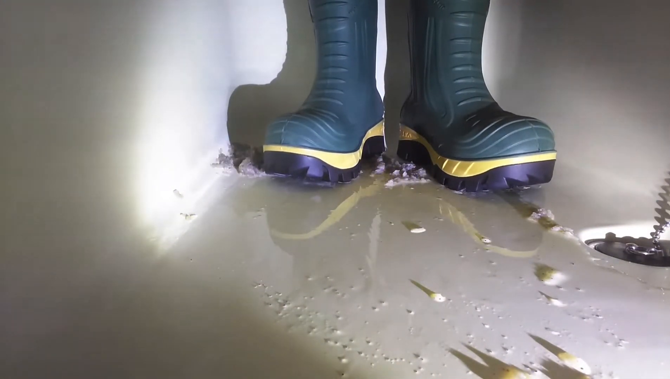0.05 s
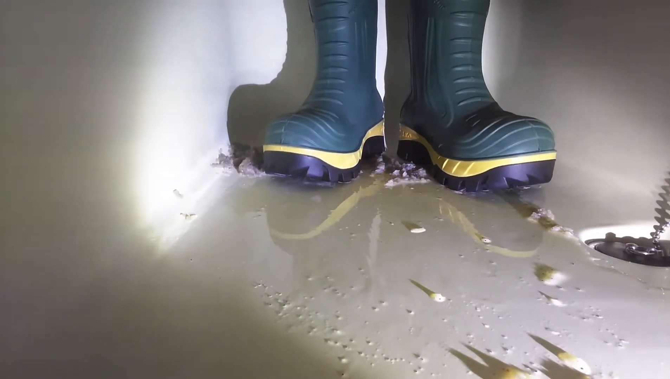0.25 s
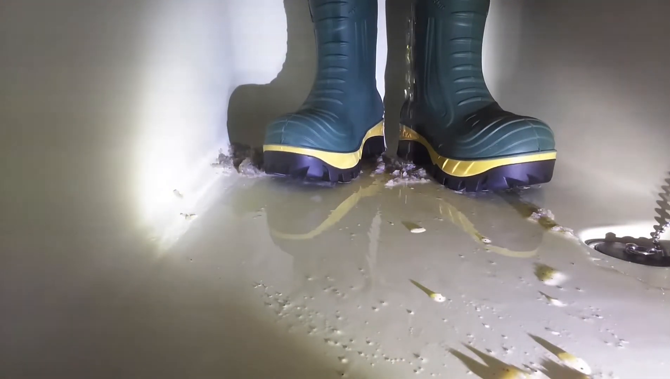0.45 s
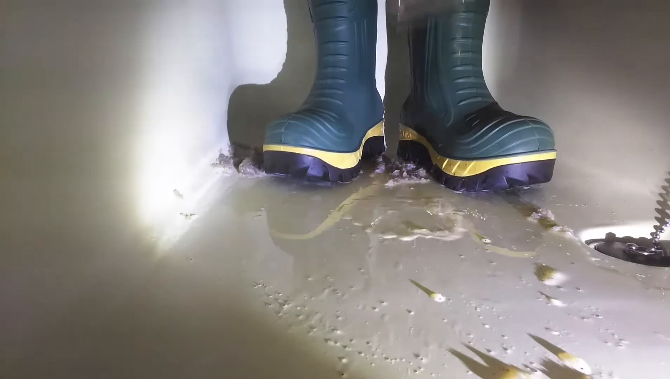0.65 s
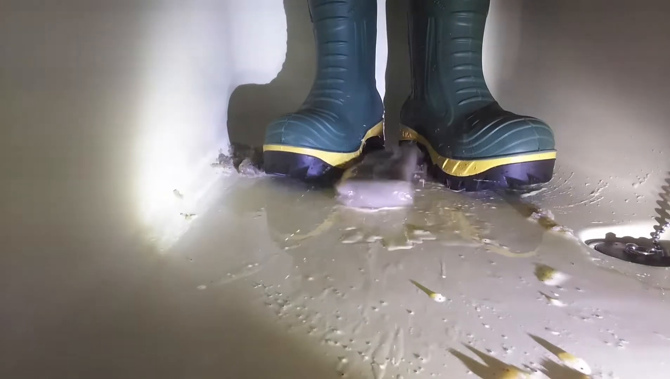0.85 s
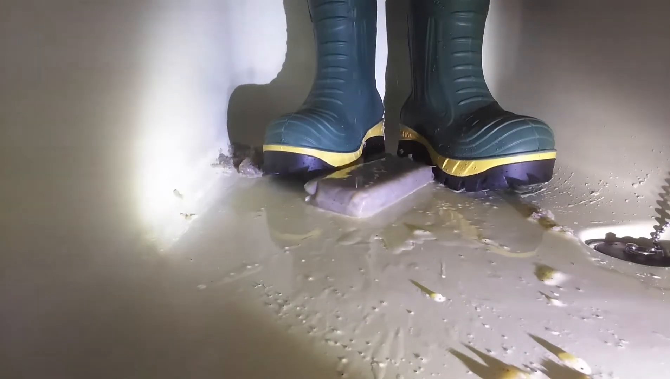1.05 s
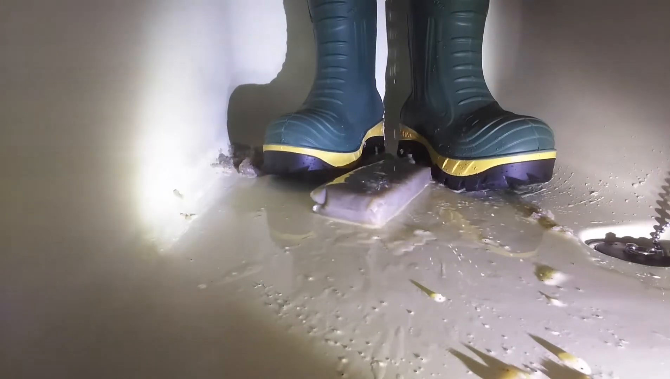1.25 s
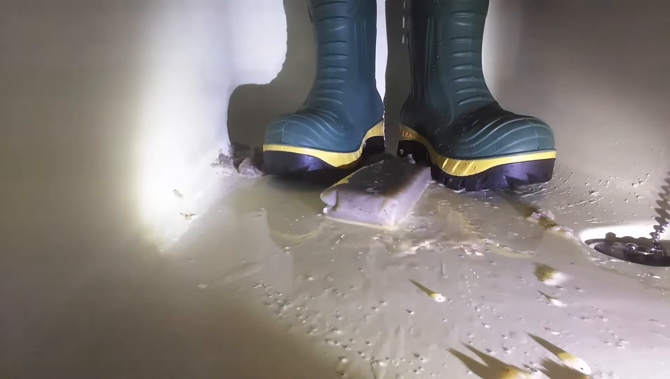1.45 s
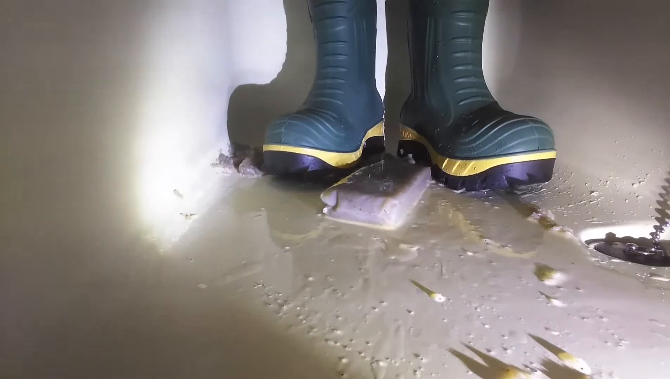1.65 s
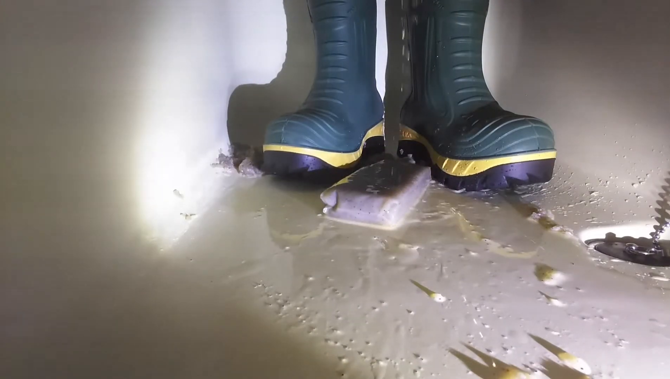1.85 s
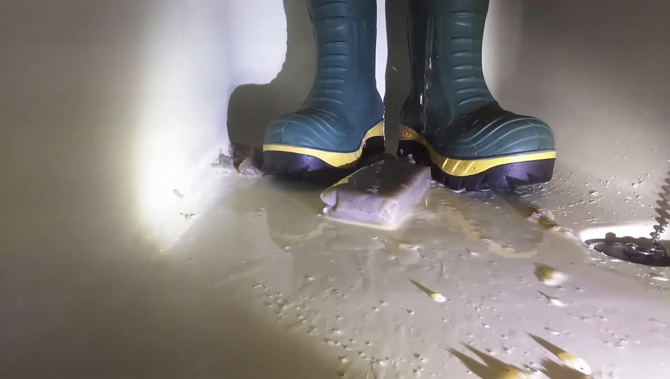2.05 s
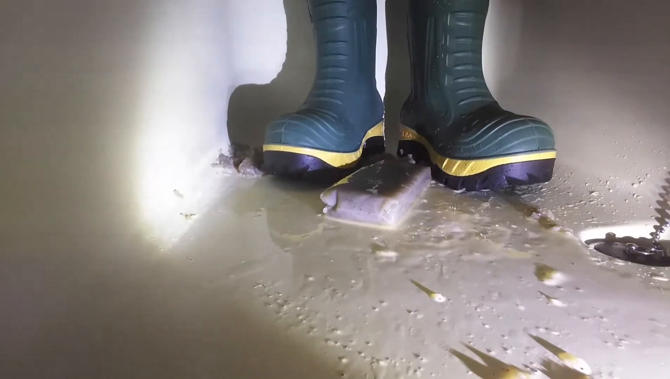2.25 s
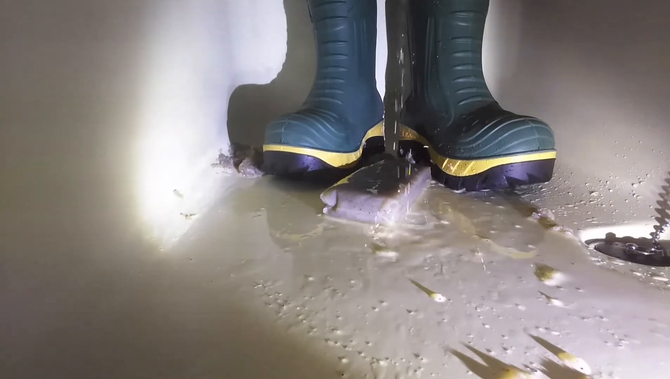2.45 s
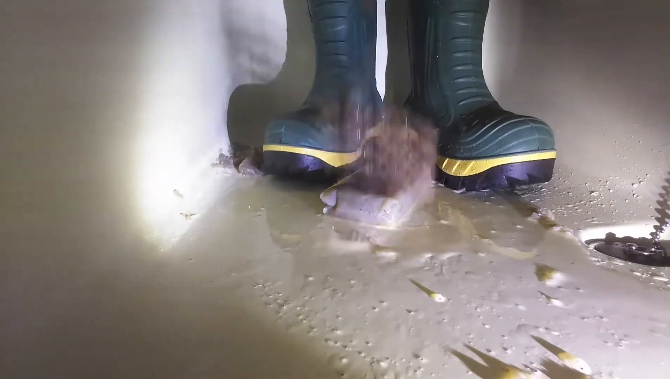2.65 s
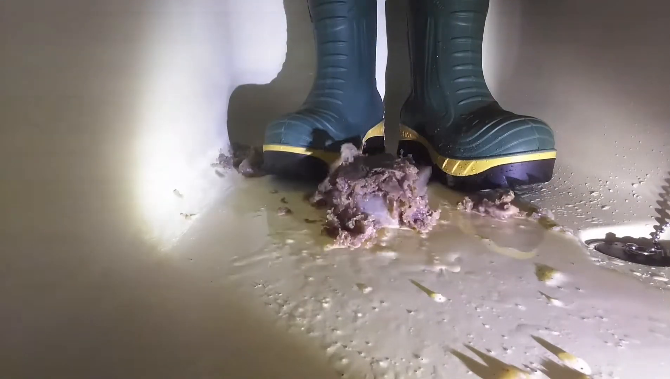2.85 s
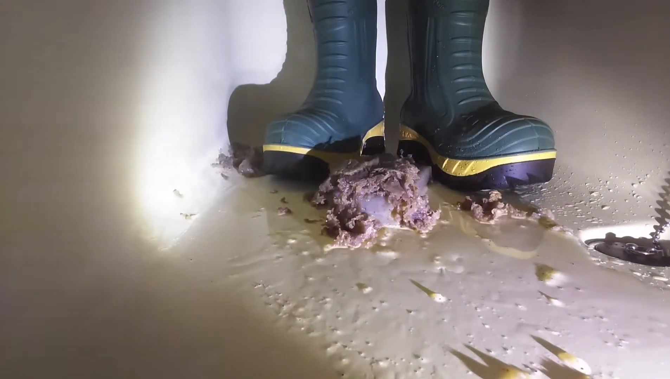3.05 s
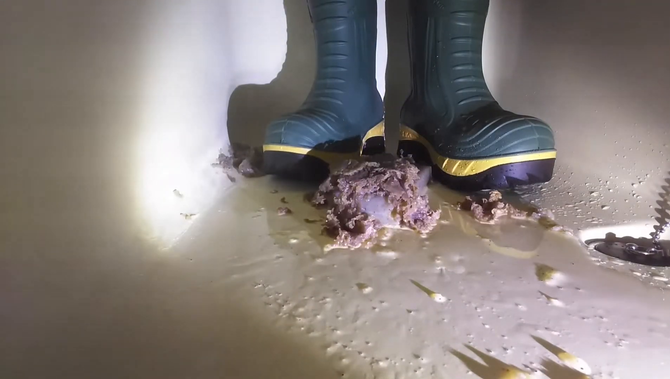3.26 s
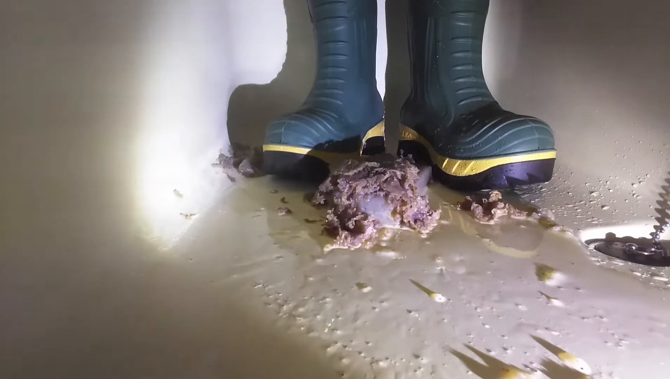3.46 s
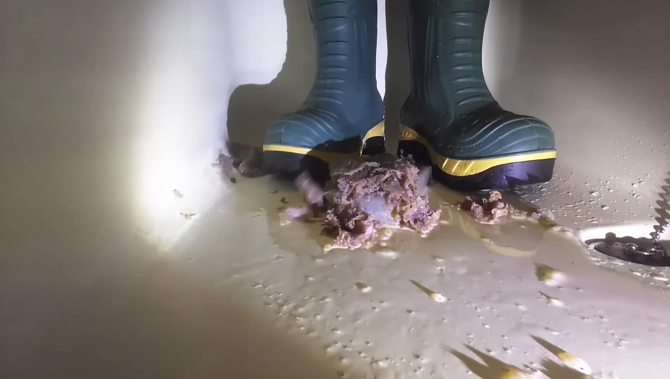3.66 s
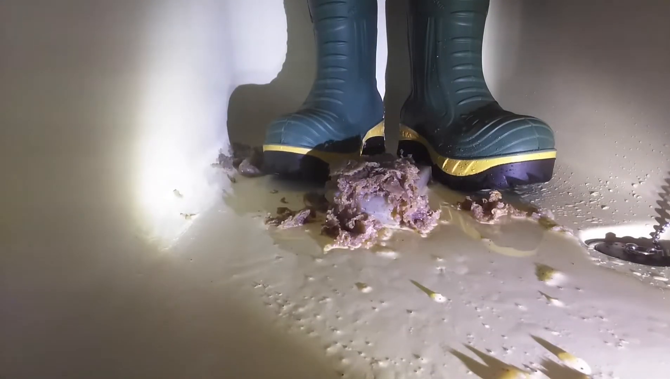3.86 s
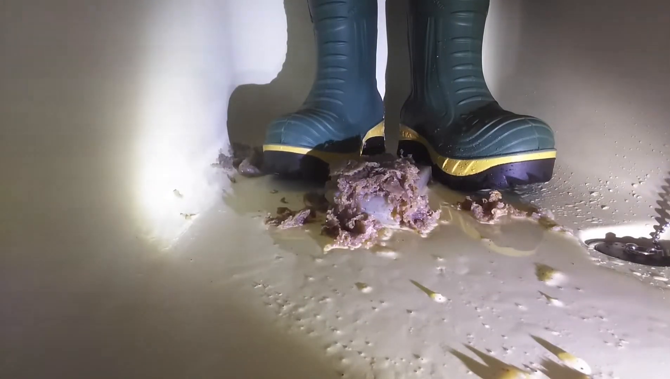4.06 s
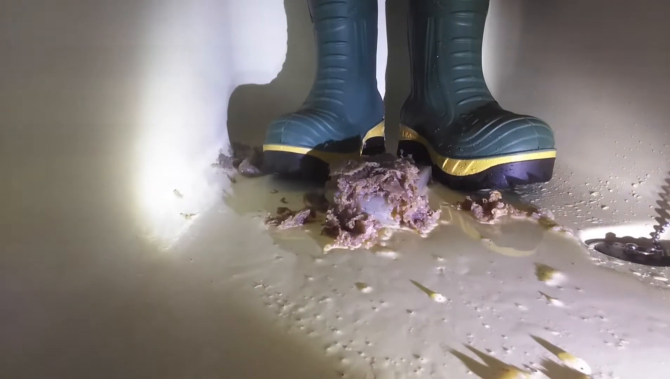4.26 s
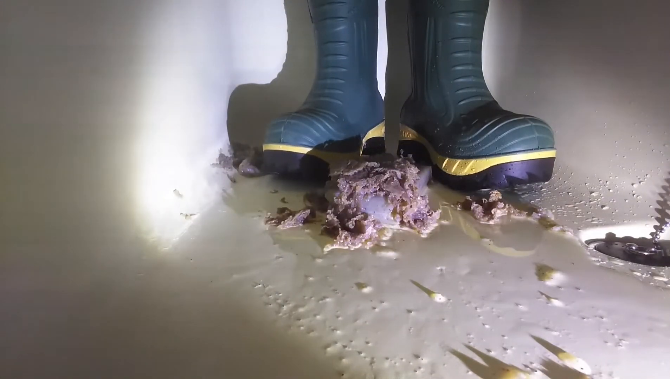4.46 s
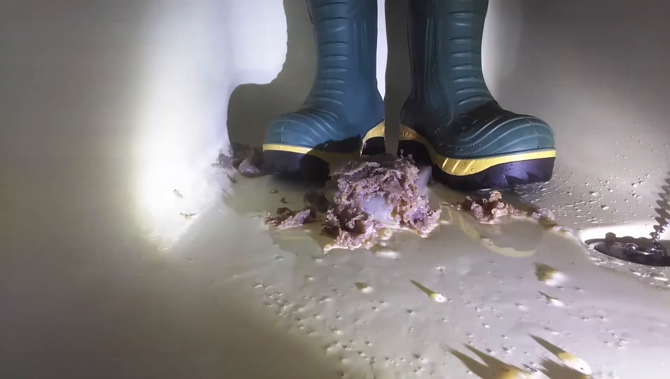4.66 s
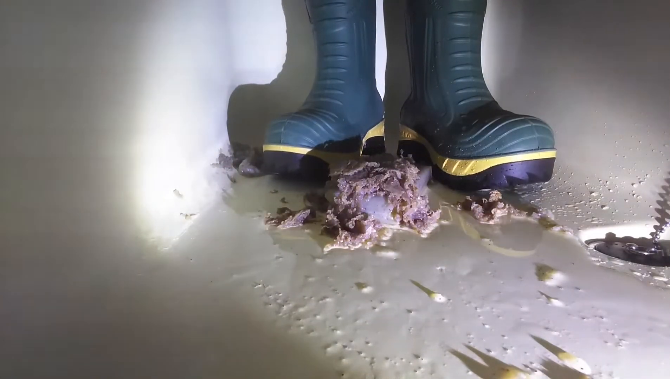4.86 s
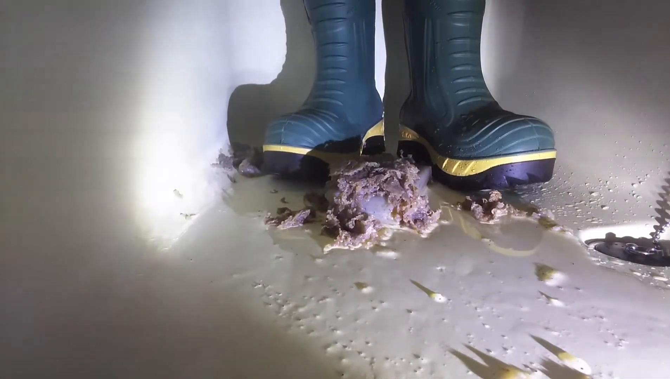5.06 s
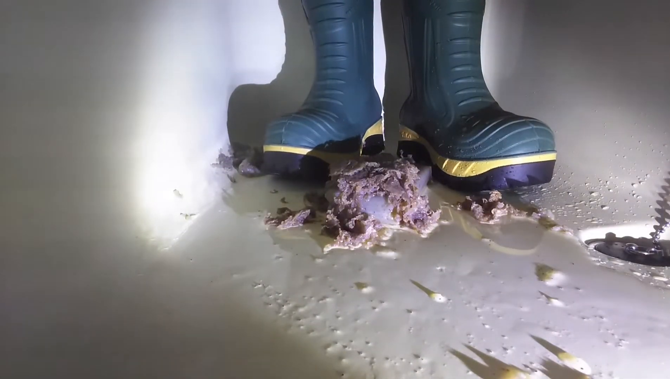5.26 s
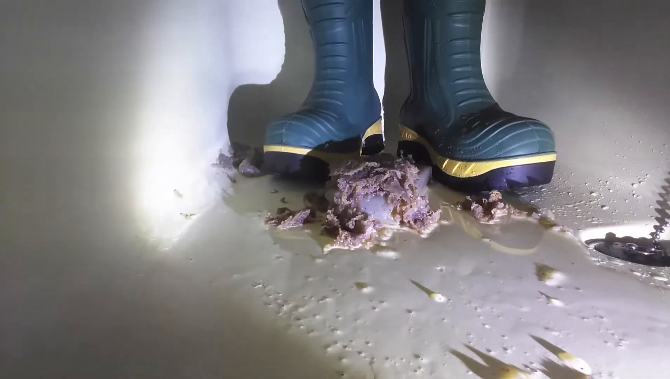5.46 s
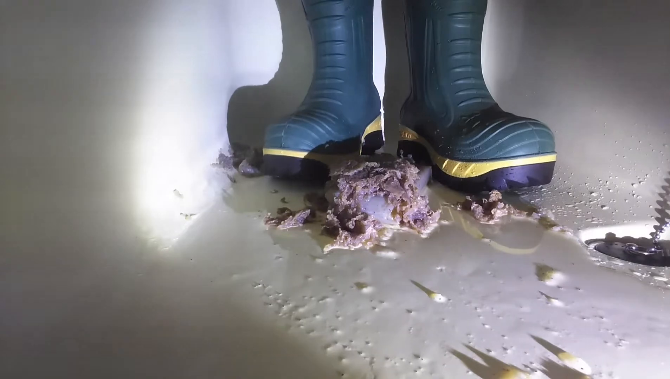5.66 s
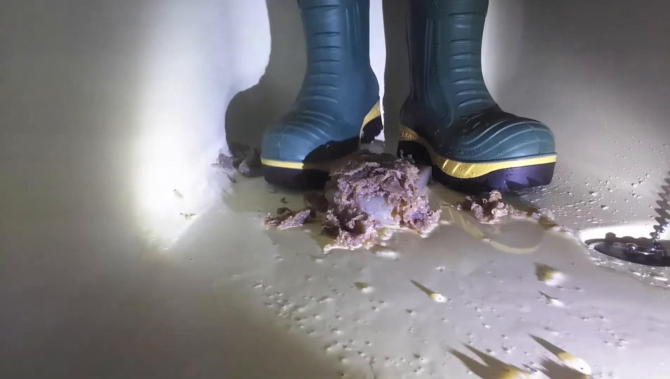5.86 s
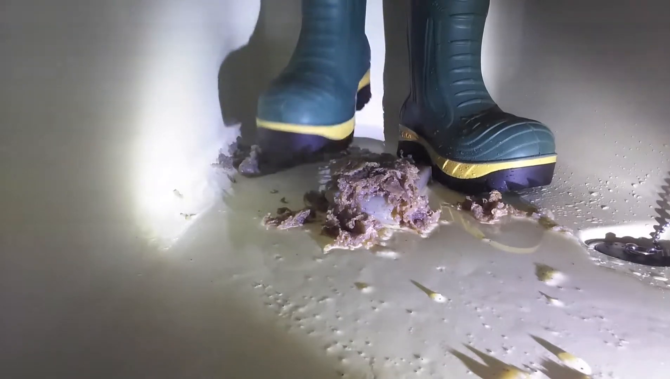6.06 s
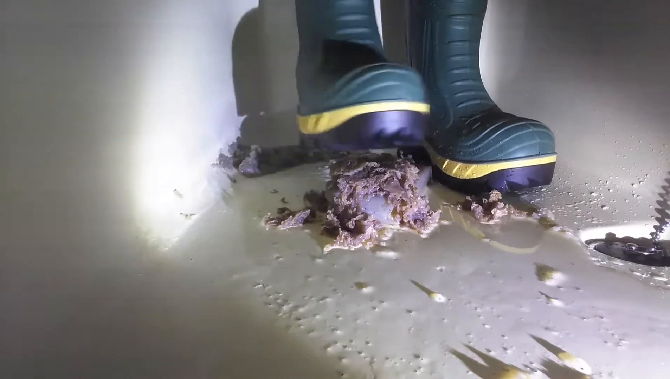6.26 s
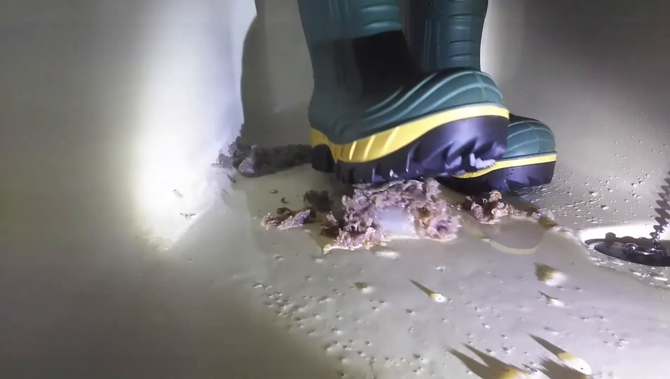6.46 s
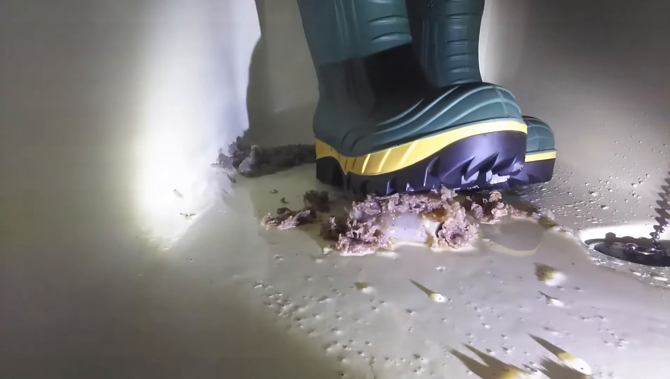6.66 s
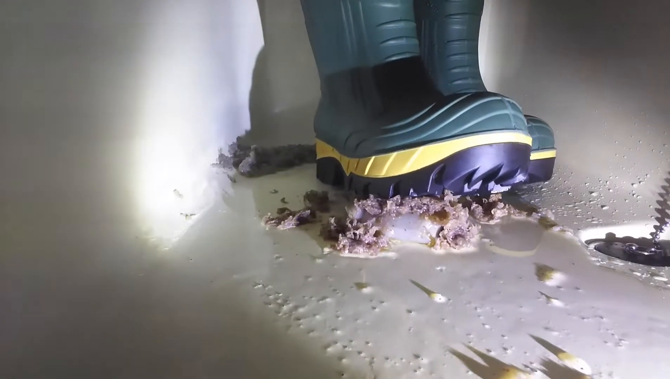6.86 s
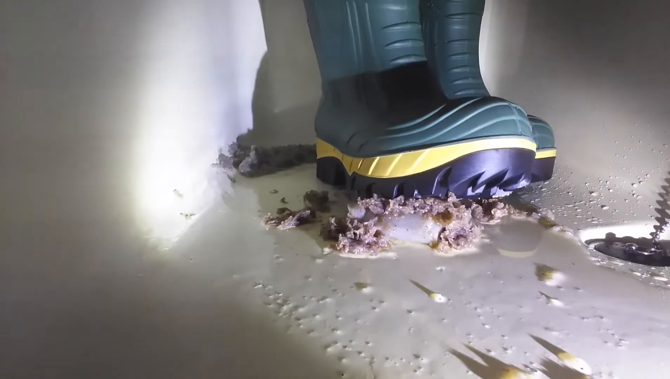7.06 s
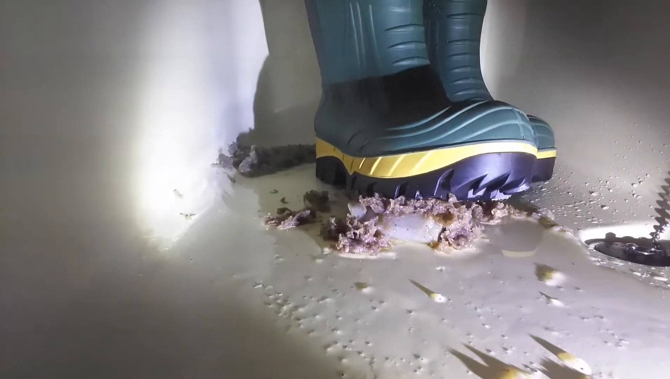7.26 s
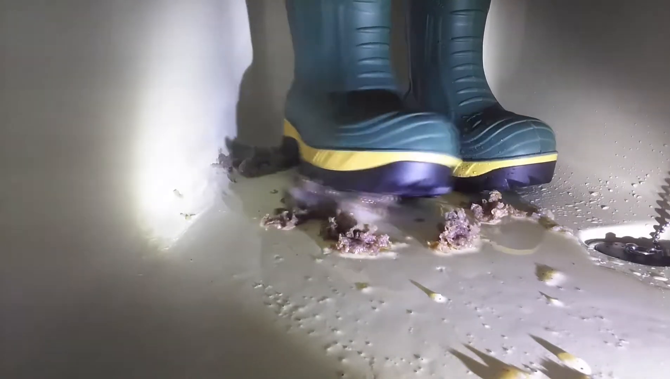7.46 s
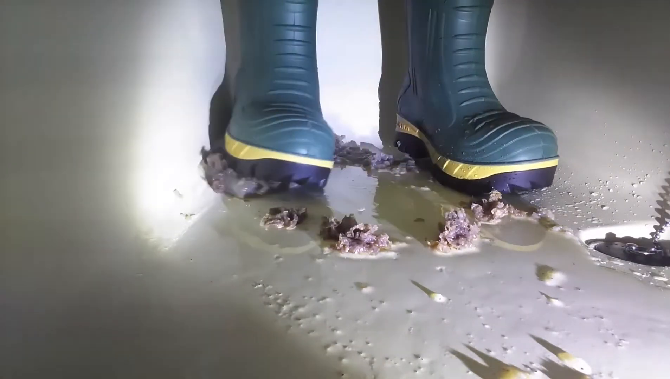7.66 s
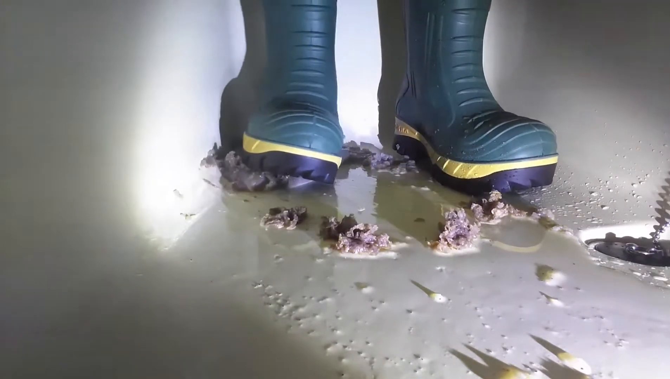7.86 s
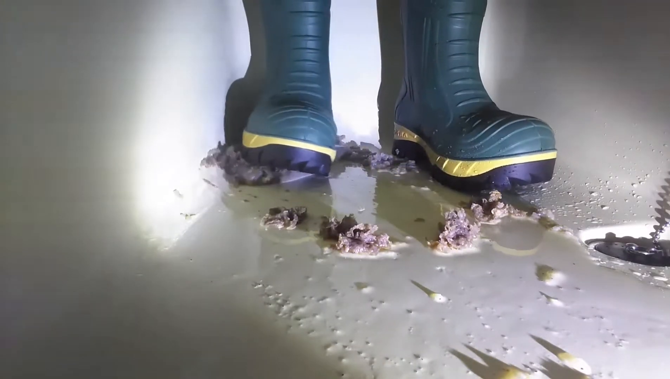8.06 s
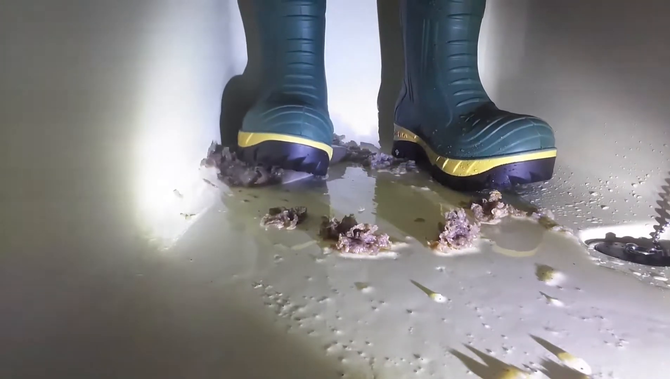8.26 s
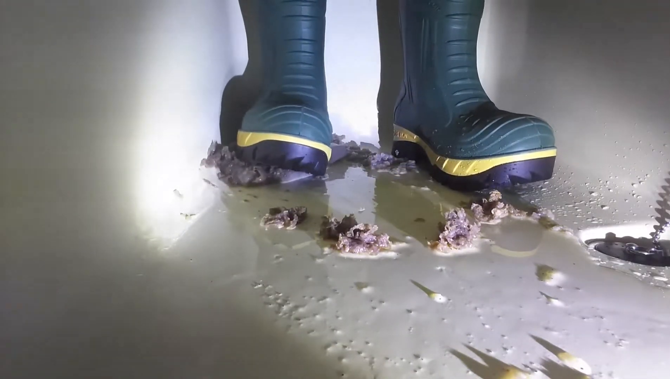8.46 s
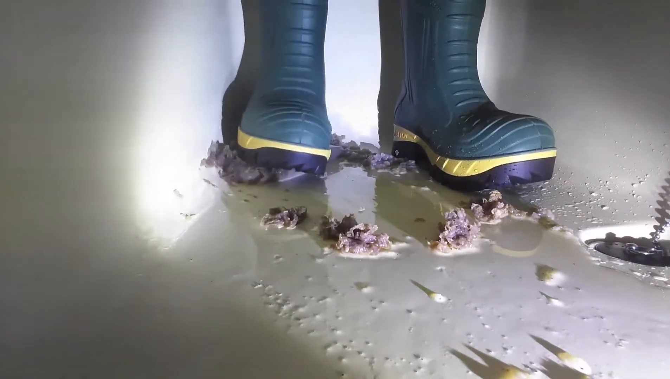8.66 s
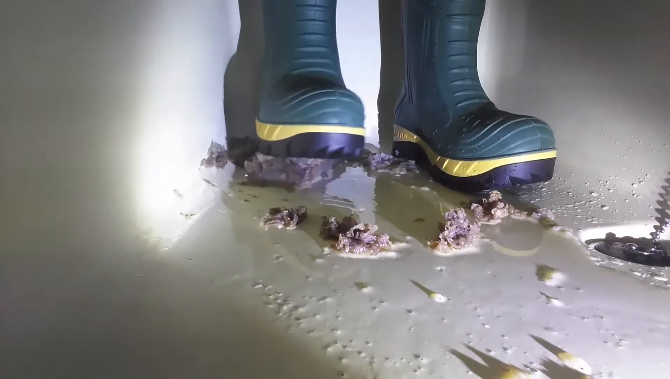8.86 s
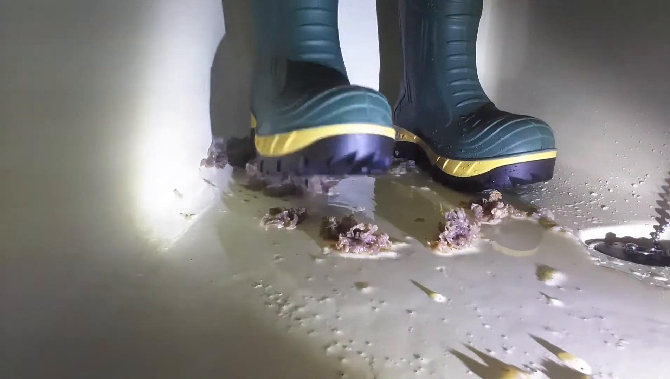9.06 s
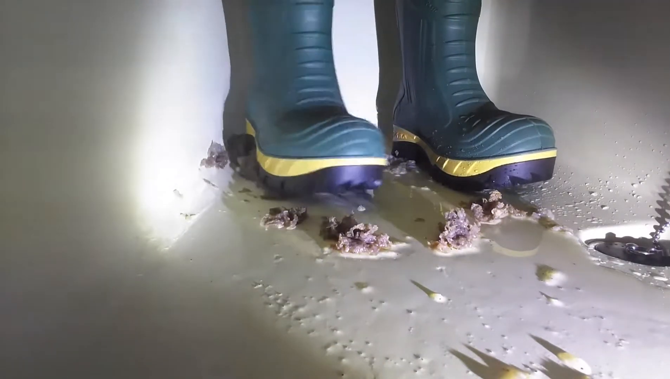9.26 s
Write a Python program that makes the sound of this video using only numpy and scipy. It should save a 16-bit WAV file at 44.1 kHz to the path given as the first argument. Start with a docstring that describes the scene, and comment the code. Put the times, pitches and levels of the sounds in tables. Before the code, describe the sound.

Soft food plops and splatters between boots in a tiled bathroom, a tin clatters faintly, then slow juicy squashing and sticky steps follow.

```python
"""A tiled bathroom, a pair of microphone ports close to the bathtub: soft food and its juice drop in
between two rubber boots as popping, smacking, spraying drops; a tin is knocked nearby as ringing noise.
A boot then peels free in coloured jerks, presses the heap, drags it back and shifts its weight: bubbles
and hiss squelch, the tub booms in its modes, the tiles answer in fading noise. A quiet house lies beneath."""
import sys
import numpy as np
from scipy import signal
from scipy.fft import rfft, irfft, next_fast_len
from scipy.io import wavfile
from scipy.ndimage import map_coordinates

SR = 44100
rng = np.random.default_rng(int(sys.argv[2]) if len(sys.argv) > 2 else 0)


def persist_wave(psi):
    """Save psi, clipped to +-1, as 16-bit WAV."""
    counts = np.round(np.clip(psi, -1, 1) * 32767).astype(np.int16)
    wavfile.write(sys.argv[1], SR, np.atleast_2d(counts).T)


N = 410571  # length in samples

# All levels of the sources in the tables are before the balance set in scene().
# The quiet house. Each row: frequency in Hz, level in dB per Hz (relative).
HOUSE_SPECTRUM = [(21, -44.5), (36, -7.5), (62, -1.5), (151, -13.5), (211, -8.5), (633, -19.5),
                  (757, -18.5), (1030, -20), (3340, -26.5), (5040, -32), (7390, -32), (9070, -34.5),
                  (12000, -37.5), (14800, -41), (16400, -63.5)]
# How the house swells and sinks. Each row: time in seconds, rumble in dB, hiss in dB.
HOUSE_LEVELS = [(0, -60, -66), (1, -54.5, -59.5), (3.2, -64, -62.5), (3.9, -62, -65.5), (4.3, -54, -65.5),
                (4.8, -58.5, -64), (5.5, -64, -60), (8, -58, -59.5), (9.31, -64, -61)]
# How alike the house reaches both ports. Each row: frequency in Hz, left-right likeness (1 is mono).
HOUSE_LIKENESS = [(60, 0.81), (180, 0.91), (550, 0), (1650, 0), (4970, 0), (15000, 0)]
# Two bands where the house hiss is stronger. Each row: centre in Hz, width in Hz, strength in dB.
HISS_BANDS = [(5090, 350, 9.5), (9300, 590, -5.5)]
HUM_HZ, HUM_DB = 40.9, -55.5  # a low steady hum

# Modes of the tub. Each row: frequency in Hz, level in dB, 60 dB decay in seconds when free to ring.
TUB_MODES = [(50, -22.5, 0.96), (99.9, -1, 0.31), (182, 2.5, 0.3), (216, -7.5, 0.64), (271.7, -10.5, 0.89),
             (332, -12.5, 0.29), (386, -11, 0.29), (475, -16, 0.62), (567, -20, 0.42)]
# The second tub mode, stirred by shifting weight. Each row: time in seconds, level in dB.
SWAY_LEVELS = [(0.5, -69), (0.79, -39.5), (0.97, -28.5), (1.26, -58.5), (1.9, -48.5), (2.6, -52),
               (2.85, -40.5), (3.03, -59), (4.1, -65), (5.04, -67.5), (5.92, -47), (6.44, -54.5),
               (6.76, -39), (6.93, -47), (7.37, -55), (7.52, -42.5), (8.18, -51.5), (8.3, -45.5),
               (9.06, -47.5), (9.31, -44)]
# Blows on the tub floor. Each row: start in seconds, level in dB, hardness in dB (lift of the upper modes),
# rise in seconds, freedom to ring (factor on the decay times).
BLOWS = [(0.57, -28, 3.5, 0.03, 0.72), (0.8, -8, -9.5, 0.024, 0.53), (0.947, -26, -2.5, 0.013, 0.84),
         (1.269, -40, -1.5, 0.0076, 0.73), (1.43, -37, -3, 0.013, 0.5), (1.604, -42.5, 0, 0.027, 1),
         (1.864, -38.5, -5.5, 0.013, 0.57), (1.986, -37.5, -2.5, 0.018, 0.73), (2.14, -37, 4, 0.015, 0.43),
         (2.206, -36, -14, 0.014, 1), (2.298, -48, -17, 0.023, 0.9), (2.431, -29, -4, 0.023, 0.46),
         (2.543, -39, 2, 0.024, 0.04), (2.754, -19.5, -4, 0.014, 1), (3.687, -49, -3.5, 0.0084, 0.7),
         (3.952, -46, -7.5, 0.015, 0.8), (5.568, -43, 13.5, 0.031, 0.54), (5.971, -27, -4, 0.023, 0.84),
         (6.546, -31.5, 1, 0.01, 1), (6.621, -17, -3.5, 0.0037, 0.52), (6.991, -39, -3, 0.031, 1),
         (7.464, -27.5, -8, 0.021, 0.93), (7.611, -17, -3.5, 0.0095, 0.07), (7.741, -15, -12.5, 0.0057, 1),
         (8.11, -14.5, -25, 0.0075, 0.74), (8.371, -17, -21, 0.011, 0.75), (8.705, -37, 3.5, 0.025, 0.4),
         (9.073, -40, -14, 0.023, 0.8)]

# Juice runs out or the sole squeezes the heap. Each row: time of full pressure in seconds, swell in seconds,
# hold in seconds, squelch in dB, tub rumble in dB, froth over squelch in dB.
SQUEEZES = [(0.495, 0.27, 0.05, -51.5, -80, -2.5), (0.612, 0.029, 0.075, -50, -34, -3),
            (0.804, .04, 0.11, -37, -34, -2), (0.975, .03, .05, -52, -42, 0),
            (1.29, 0.12, 0.15, -58, -55, 1.5), (1.489, 0.066, 0.036, -46, -35.5, -10),
            (2.0, .1, .2, -71, -58, 6), (2.324, 0.046, 0.083, -64, -41.5, 12),
            (2.482, .06, 0.14, -48.5, -46.5, -3), (2.809, 0.054, 0.055, -42.5, -41, 3.5),
            (5.05, .04, .02, -60, -68, 2), (5.21, 0.078, 0.18, -56.5, -72, -13),
            (6.534, .12, 0.15, -36.5, -48.5, -8), (6.732, .04, 0.053, -36, -43.5, -13),
            (6.846, 0.022, 0.054, -36.5, -64, -8.5), (6.991, .003, 0.0094, -40.5, -57, -16),
            (7.064, 0.033, 0.038, -40, -48, -17), (7.375, 0.32, 0.11, -46, -58, -6),
            (7.477, 0.048, 0.045, -32.5, -48, -20), (7.59, 0.084, 0.12, -39, -42, -6),
            (7.895, .04, 0.016, -59.5, -62, 2), (8.102, .03, 0.16, -56.5, -50, -1.5),
            (8.418, 0.022, 0.082, -60.5, -45.5, -4.5), (8.709, 0.016, 0.017, -37, -55, -15),
            (8.811, 0.13, 0.031, -39.5, -70, -1.5), (9.072, 0.0093, 0.013, -44, -56, -1.5),
            (9.201, 0.043, 0.027, -33, -47.5, -4.5), (9.267, 0.014, 0.019, -33.5, -46, -20)]
SWELL_DB, FADE_DB_PER_S = 16, 150  # rise over one swell time; fall after the hold
# Hiss of the squeezed mush. Each row: frequency in Hz, level in dB per Hz (relative).
MUSH_SPECTRUM = [(180, -38.5), (300, -34.5), (384, 4.5), (417, -16), (656, -18), (951, -2.5), (1320, -6),
                 (1600, -9), (2000, -4.5), (2450, -7), (2950, -5), (3920, -5.5), (8000, -19),
                 (10400, -52.5), (17600, -120)]
# The finest bubbles. Each row: frequency in Hz, level in dB per Hz (relative).
FROTH_SPECTRUM = [(3000, -34), (6000, -0.5), (8000, -7.5), (9200, -4.5), (11000, -14.5), (14500, -27),
                  (16000, -40.5)]

# Wet drops and snaps. Each row: start in seconds, pop in dB, nominal pop pitch in Hz, cycles until the pop
# is loudest, smack in dB, spray in dB, left over right in dB (pop and spray only).
DROPS = [(0.4452, -40, 3300, 1.2, -55, -45.5, 2), (0.4827, -25.5, 6030, 2.2, -59, -47, 1),
         (0.512, -15.5, 4900, 1.5, -72, -48, -1), (0.5684, -42, 1910, 2.3, -30, -34.5, 1),
         (0.686, -50, 2000, 1.5, -44, -44, 2.0), (0.7082, -17, 9340, 2.4, -36, -29, -2.5),
         (0.7823, -34, 1770, 1.3, -32, -29.5, 0), (0.7993, -13, 9000, 2.2, -26, -18, 0),
         (0.8184, -17.5, 2540, 3.2, -23, -16.5, 0), (0.8394, -24, 4720, 2.2, -28, -31, 6),
         (0.9355, -39, 1860, 1.7, -24, -24, 2), (0.9477, -14, 6670, 2.5, -16.5, -20, -2.5),
         (0.9702, -17.5, 4900, 2, -28.5, -49, 2), (1.1527, -34, 10500, 3.1, -44, -47, -1.5),
         (1.2582, -21, 6230, 1.7, -39.5, -32.5, 0), (1.433, -9.5, 3500, 3, -46.5, -20, -1),
         (1.607, -7, 8970, 0.76, -41, -46, -0.5), (1.8372, -41, 9600, 2.2, -47, -67, -12),
         (1.8654, -31.5, 9700, 4.5, -48, -46.5, -2), (1.9734, -32, 9350, 3.6, -51, -39.5, 1),
         (1.9862, -14, 9100, 0.36, -52, -48.5, -2.0), (2.0481, -16, 9200, 2.2, -71, -69, -2),
         (2.144, -25, 7040, 3.3, -38, -40.5, -1), (2.2078, -45, 1630, 1.5, -33, -37.5, 2),
         (2.2296, -25, 10300, 2.8, -37, -45, 0), (2.2972, -11, 6640, 3.9, -51, -30.5, -1.5),
         (2.4337, -32, 3900, 2.7, -32.5, -27, 1), (2.5426, -25.5, 6800, 5.1, -38, -33.5, -2),
         (2.586, -20, 8800, 2.5, -39.5, -44, -2), (2.7579, -5, 3470, 2.4, -22, -11, 2),
         (3.0894, -45, 7600, 1.95, -86, -57, -19), (3.2525, -50, 3960, 2.05, -71, -53, -5),
         (3.5277, -56, 1770, 1.7, -51.5, -60, 0.0), (3.6602, -51, 3800, 1.2, -54.5, -50, 2),
         (3.685, -35, 8950, 1.6, -44, -35.5, -3.5), (3.9552, -33.5, 3940, 2.4, -65, -50.5, 1),
         (4.1535, -46, 2030, 1.8, -71, -65, 2.5), (4.421, -38.5, 9100, 1.3, -54.5, -53, -3),
         (5.0508, -42.5, 2310, 2.5, -74, -62, 1), (5.1294, -55, 2180, 1.7, -69, -51, 1),
         (5.223, -29, 4470, 2.1, -50, -53, 0), (5.3486, -38, 2280, 1.6, -51.5, -44.5, 0),
         (6.5435, -20.5, 2800, 1.4, -37.5, -30.5, -1), (6.5692, -17.5, 1920, 2.5, -32.5, -26.5, 2),
         (6.7677, -18, 2390, 2.1, -37, -34.5, 0), (6.852, -30, 1830, 3.1, -62, -32, -2),
         (6.891, -33, 2360, 4.4, -59, -60, -2), (6.9496, -31, 1930, 1.6, -54, -59, 3),
         (6.99, -16.5, 3020, 0.77, -49, -37, -2), (7.066, -20.5, 3520, 0.85, -44, -33, 4),
         (7.0796, -19, 3800, 1.3, -47, -35, -4), (7.1392, -33, 2680, 1.9, -60, -43, 7),
         (7.304, -30.5, 3880, 1.6, -53, -41.5, 3), (7.364, -32, 2740, 1.4, -53, -57, 0),
         (7.4609, -23, 2820, 1.3, -30, -35, 2.0), (7.4984, -24.5, 1840, 2.1, -48, -48, 4),
         (7.7403, -27.5, 2400, 1.9, -24.5, -52, -1), (8.1048, -55, 2600, 2.2, -37.5, -49, 4),
         (8.4474, -35, 1845, 0.83, -50, -53, 0.5), (8.7059, -33, 1630, 2.2, -43, -31, 0),
         (9.0748, -38, 4100, 3.1, -41.5, -31.5, 1), (9.174, -35, 2970, 1.9, -41.5, -37, 0),
         (9.264, -15, 4000, 2.8, -40, -45, 1)]
# The smack of the heavy mass. Each row: frequency in Hz, level in dB per Hz (relative).
SMACK_SPECTRUM = [(150, -25.5), (250, -3), (563, -15), (599, -19.5), (768, -14.5), (976, -12),
                  (1050, -17.5), (3000, -33), (3900, -57), (6600, -120)]
# The spray. Each row: frequency in Hz, level in dB per Hz (relative).
SPRAY_SPECTRUM = [(710, -44), (1200, -2.5), (1460, -26), (1640, -21), (1750, -6), (3470, -6), (3740, -1),
                  (7570, -6.5), (8820, -7.5), (14700, -23.5), (16000, -34)]

# Clatter of the tin. Each row: start in seconds, level in dB, rise in seconds, 60 dB decay in seconds.
TIN_KNOCKS = [(5.546, -34, 0.0052, 0.064), (5.557, -30, 0.0005, 0.0057), (5.562, -31, 0.0071, 0.53)]
# Modes of the tin shell. Each row: frequency in Hz, width in Hz, strength in dB.
TIN_MODES = [(327.8, 5.9, 16), (865, 78, 14), (1130, 41, 7), (1364, 29, 13), (1470, 14, -5), (1830, 44, -4),
             (2740, 50, -7), (3045, 40, 9), (3190, 48, 21), (3210, 30, 14.5), (3480, 260, 4.5),
             (3750, 27, -10), (4720, 84, 17.5), (4850, 80, 17.5), (5170, 110, 13.5), (9000, 220, 7)]
# Contact noise of the tin. Each row: frequency in Hz, level in dB per Hz (relative).
CLATTER_SPECTRUM = [(120, -16.5), (280, -2.5), (600, -14), (1300, 0), (3000, -4), (5000, -13),
                    (9000, -20.5), (12000, -33), (16000, -53.5)]

# A boot peels off the enamel in jerks. Each row: start in seconds, level in dB, rise in seconds,
# 60 dB decay in seconds, treble tilt in dB per octave (gentler below about 1500 Hz).
BOOT_PEELS = [(6.02, -34, 0.016, 0.059, -1.5), (6.04, -41, 0.0092, 0.12, 1), (6.12, -58.5, 0.055, 0.3, 5),
              (6.431, -64, 0.016, 0.21, -25), (6.2, -46, 0.026, 0.089, -7.5),
              (6.289, -46.5, 0.01, 0.11, -13.5), (6.37, -58, 0.0094, .25, -23)]
# Resonances of the hollow boot. Each row: frequency in Hz, width in Hz, strength in dB.
BOOT_MODES = [(326, 25, 5), (478, 39, 13.5), (550, 28, -2), (775, 47, 16), (874, 17, 0), (1314, 14, 9.5),
              (1405, 39, 10.5), (1530, 26, -18), (3230, 380, 11.5), (5230, 170, 16.5)]
# Noise of the peeling rubber. Each row: frequency in Hz, level in dB per Hz (relative).
RUBBER_SPECTRUM = [(150, -6), (400, 0), (650, -11), (1400, 0.5), (2000, -13.5), (5000, -20.5), (9000, -22),
                   (12000, -32), (16000, -49.5)]

# The tiled room. Each row: frequency in Hz, 60 dB decay in seconds.
TILE_DECAYS = [(100, 0.66), (500, 0.68), (1500, 0.44), (4000, 0.39), (10000, 0.32), (16000, 0.13)]
# Unequal colour of the ports. Each row: frequency in Hz, left over right in dB.
PORT_BALANCE = [(60, 2), (130, 0), (290, 2.0), (640, 2), (1410, 1), (3100, 2), (6820, -1), (15000, 1.5)]
# The right port rings. Each row: frequency in Hz, width in Hz, strength in dB.
RIGHT_PORT_RING = [(9180, 770, 2.5)]
LOW_HZ, TOP_HZ = 35.2, 16300  # bass cut and band limit of the microphone


def amp(db):
    """dB to gain."""
    return 10 ** (np.asarray(db) / 20)


def unit(x):
    """Scaled to rms 1."""
    return x / np.sqrt(np.mean(x ** 2) + 1e-20)


def along(points, hz):
    """Values between (Hz, value) points on a log frequency axis."""
    f, v = np.transpose(points)
    return np.interp(np.log(hz + 1), np.log(f + 1), v)


def coloured(spectrum):
    """The gain over frequency of a dB spectrum."""
    return lambda hz: amp(along(spectrum, hz))


def even(spectrum):
    """The colour of a spectrum, scaled so that white noise keeps its power."""
    return lambda hz: unit(amp(along(spectrum, hz)))


def curve(rows, column):
    """One gain per sample from a dB column."""
    s, db = np.transpose(rows)[[0, column]]
    return amp(np.interp(np.arange(N) / SR, s, db))


def wobble(rate):
    """A smooth random curve, rate knots a second."""
    knots = rng.standard_normal(int(N * rate / SR) + 4)
    return map_coordinates(knots, [np.arange(N) * rate / SR])


def filtered(x, response):
    """x passed through a complex response of frequency."""
    m = next_fast_len(N + SR // 2)
    return irfft(rfft(x, m) * response(np.fft.rfftfreq(m, 1 / SR)), m)[..., :N]


def resonances(table):
    """The response of (Hz, width, dB) resonances side by side, with alternating sign."""
    def response(hz):
        total = 0
        for k, (centre, width, db) in enumerate(table):
            damping = 1j * hz * width
            total = total + (-1) ** k * amp(db) * damping / (centre ** 2 - hz ** 2 + damping)
        return total
    return response


def add(track, s, sound):
    """Lay a sound on a track at s seconds, cut at the end of the track."""
    part = track[..., round(s * SR):][..., :sound.shape[-1]]
    part += sound[..., :part.shape[-1]]


def ring(modes, t, spread_db, shorten):
    """Modes at random strengths and phases, each fading at its own speed."""
    hz, db, t60 = np.transpose(modes)[..., None]
    db = db + spread_db * rng.standard_normal(hz.shape)
    phase = rng.random(hz.shape)
    fade = amp(db - 60 * t / (shorten * t60))
    return np.sum(fade * np.sin(2 * np.pi * (hz * t + phase)), axis=0)


def bubbles(count, mid_hz, cycles):
    """Short damped pops at random times, pitches and sizes, placed at random between the ports."""
    at, pitch, size, pan = rng.random((4, count, 1))
    k = np.arange(200)
    turns = mid_hz * 3.5 ** (pitch - .5) * k / SR
    loudness = amp(-6 * np.log(size + 0.14))
    pops = loudness * np.exp(-turns / cycles) * np.sin(2 * np.pi * turns)
    where = ((at * N).astype(int) + k).ravel()
    sides = [np.bincount(where, (pops * side).ravel(), N + 200)[:N] for side in (pan, 1 - pan)]
    return unit(np.array(sides))


def jolt(rise, t60, colour, lumpy_db):
    """Half a second of lumpy contact noise through a body, rms 1."""
    t = np.arange(SR // 2) / SR
    lumps = amp(lumpy_db * np.interp(t, np.arange(100) / 200, rng.standard_normal(100)))
    envelope = (1 - np.exp(-(t / rise) ** 2)) * amp(-60 * t / t60)
    contact = envelope * lumps * rng.standard_normal(len(t))
    return unit(irfft(rfft(contact) * colour(np.fft.rfftfreq(len(t), 1 / SR)), len(t)))


def pressure():
    """Gains of squelch, rumble and froth: every press swells, holds and fades."""
    s, swell, hold, squelch_db, rumble_db, froth_db = np.transpose(SQUEEZES)[..., None]
    t = np.arange(0, N, 32) / SR  # every 32nd sample is fine enough
    rise_db = SWELL_DB * np.minimum(t - s, 0) / swell
    fall_db = FADE_DB_PER_S * np.maximum(t - s - hold, 0)

    def total(db):
        power_sum = np.linalg.norm(amp(db + rise_db - fall_db), axis=0)
        return np.interp(np.arange(N) / SR, t, power_sum)
    return total(squelch_db), total(rumble_db), total(squelch_db + froth_db)


def hush():
    """Distant rumble, hiss and a hum; mid and side shares make the bass near mono."""
    def mid_side_shape(hz):
        angle = np.arccos(np.clip(along(HOUSE_LIKENESS, hz), -1, 1)) / 2
        return amp(along(HOUSE_SPECTRUM, hz)) * [np.cos(angle), np.sin(angle)]

    mid, side = filtered(rng.standard_normal((2, N)), mid_side_shape)
    both = np.array([mid + side, mid - side])
    low = filtered(both, lambda hz: 1 / (1 + (hz / 700) ** 2))
    high = filtered(both - low, lambda hz: 1 + np.abs(resonances(HISS_BANDS)(hz)))
    rumble = amp(1.4 * wobble(32)) * curve(HOUSE_LEVELS, column=1) * unit(low)
    hiss = amp(0.27 * wobble(11)) * curve(HOUSE_LEVELS, column=2) * unit(high)
    hum_phase = 2 * np.pi * HUM_HZ * np.arange(N) / SR + 0.68 * wobble(2.0)
    hum = amp(HUM_DB + 1.2 * wobble(7.5)) * np.sin(hum_phase)
    return rumble + hiss + hum


def tub():
    """Blows and shifting weight drive the tub's modes; a harder blow wakes more of the upper ones."""
    # the load of the boots widens the modes
    loaded = resonances([(hz, 5 / t60, db) for hz, db, t60 in TUB_MODES[2:]])
    uneven_push = amp(2.4 * wobble(11)) * rng.standard_normal(N)
    rumble = pressure()[1] * unit(filtered(uneven_push, loaded))
    sway_mode = resonances([(TUB_MODES[1][0], 14, 0)])
    sway = curve(SWAY_LEVELS, column=1) * unit(filtered(rng.standard_normal(N), sway_mode))
    boom, t = np.zeros(N), np.arange(SR * 3 // 4) / SR
    for s, db, hard_db, rise, free in BLOWS:
        struck = [(hz, level + hard_db * (hz > 140), t60) for hz, level, t60 in TUB_MODES]
        onset = 1 - np.exp(-t / rise * 3)
        add(boom, s, amp(db) * onset * ring(struck, t, spread_db=1.76, shorten=free))
    return rumble + sway + boom


def settling():
    """The heap settles: rare, faint, high pops."""
    return amp(-71.5) * bubbles(count=120, mid_hz=5990, cycles=2.9)


def squelch():
    """Pops and hiss squeezed out of the mush in clumps; froth on top."""
    push, _, fizz = pressure()
    hiss = unit(filtered(rng.standard_normal((2, N)), coloured(MUSH_SPECTRUM)))
    froth = unit(filtered(rng.standard_normal((2, N)), coloured(FROTH_SPECTRUM)))
    body = hiss + 0.73 * bubbles(count=1200, mid_hz=2730, cycles=1.4)
    clumps = amp(2.5 * wobble(45))
    return clumps * (push * body + fizz * froth)


def splats():
    """A burst pocket of air chirps upward just after the wet mass smacks the enamel and sprays."""
    pops, smacks, spray = np.zeros((3, 2, N))
    t = np.arange(SR // 20) / SR
    spurt = amp(-60 * t / 0.014) * (1 - np.exp(-t / 0.00044))
    spurt /= spurt.max()
    for s, pop_db, hz, cycles, smack_db, spray_db, pan_db in DROPS:
        side = amp([[pan_db / 2], [-pan_db / 2]])
        turns = hz * t
        swell = turns / cycles * np.exp(1 - turns / cycles)
        chirp = np.sin(2 * np.pi * turns * (0.815 + 0.0277 * np.minimum(turns, 12)))
        add(pops, s + .0008, side * amp(pop_db) * swell * chirp)
        add(smacks, s, amp(smack_db - 60 * t / 0.081) * rng.standard_normal(len(t)))
        add(spray, s, side * amp(spray_db) * spurt * rng.standard_normal((2, len(t))))
    return pops, filtered(smacks, even(SMACK_SPECTRUM)) + filtered(spray, even(SPRAY_SPECTRUM))


def tin():
    """Thin metal clatters: rough contact noise, part of it ringing in the shell's modes."""
    out, shell = np.zeros(N), resonances(TIN_MODES)
    colour = lambda hz: amp(along(CLATTER_SPECTRUM, hz)) * (1.14 + shell(hz))
    for s, db, rise, t60 in TIN_KNOCKS:
        add(out, s, amp(db) * jolt(rise, t60, colour, lumpy_db=1.5))
    return out


def boot():
    """The lifting sole sucks free; the hollow boot colours each jerk."""
    out, hollow = np.zeros(N), resonances(BOOT_MODES)
    for s, db, rise, t60, tilt_db in BOOT_PEELS:
        def colour(hz):
            rubber_db = along(RUBBER_SPECTRUM, hz) + tilt_db * np.log2(1 + hz / 1500)
            return amp(rubber_db) * (1.27 + hollow(hz))
        add(out, s, amp(db) * jolt(rise, t60, colour, lumpy_db=0.0))
    return out


def bathroom(x):
    """Fading noise: a short answer of the tub walls, then tiles where each frequency dies at its own speed."""
    out, step = np.zeros((2, N)), SR // 4
    for start in range(0, N, step):  # a fresh random pattern every quarter second
        hz, t, z = signal.stft(rng.standard_normal((2, SR * 2 // 3)), SR, nperseg=256)
        tiles = amp(-60 * t / along(TILE_DECAYS, hz)[:, None])
        tub_walls = 0.55 * amp(-60 * t / 0.093)
        tail = signal.istft(z * (tiles + tub_walls), SR, nperseg=256)[1]
        tail /= np.linalg.norm(tail[0])
        add(out, start / SR + .002, signal.fftconvolve(x[:, start:start + step], tail, axes=1))
    return out


def scene():
    """Bright sounds fill the room; the direct boom of the tub reaches both ports alike."""
    house, boom = hush(), tub()
    mush = squelch() + settling()
    pops, drops = splats()
    jolts = tin() + boot()
    # the tub's boom is echoed mainly above about 150 Hz; its deepest notes stay dry
    upper = filtered(boom, lambda hz: hz ** 3 / (hz ** 3 + 150 ** 3))
    to_room = amp(-5.0) * pops + amp(1.0) * drops + amp(-10) * mush + amp(-1.5) * jolts + amp(-3.0) * upper
    echo = bathroom(to_room)
    mid, side = (echo[0] + echo[1]) / 2, (echo[0] - echo[1]) / 2
    side = filtered(side, lambda hz: hz ** 3 / (hz ** 3 + 230 ** 3))  # the bass of the echo is near mono
    room = np.array([mid + side, mid - side])
    direct = amp(-7.5) * pops + amp(-3.5) * drops + amp(-7.5) * mush + amp(-9.5) * jolts + boom
    return direct + room + house


def record(dry):
    """Two ports of unequal colour, with a steep bass cut and nothing above the band limit."""
    def microphone(hz):
        balance = amp(along(PORT_BALANCE, hz) * [[.5], [-.5]])
        right_ring = 1 + [[0], [1]] * resonances(RIGHT_PORT_RING)(hz)
        bass_cut = hz ** 8 / (hz ** 8 + LOW_HZ ** 8)
        return balance * right_ring * bass_cut * (hz < TOP_HZ)
    return filtered(dry, microphone)


dry = scene()
out = record(dry)
persist_wave(out)
```